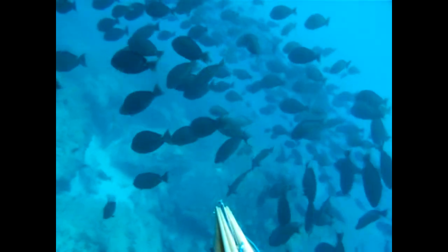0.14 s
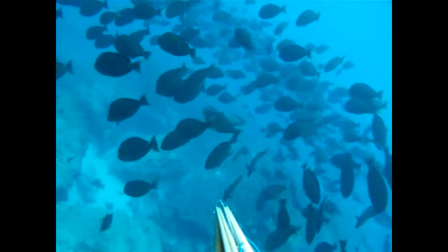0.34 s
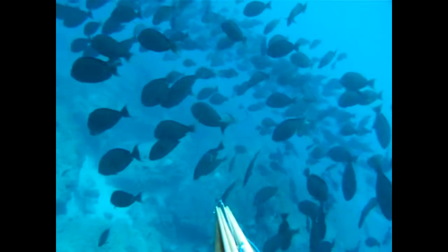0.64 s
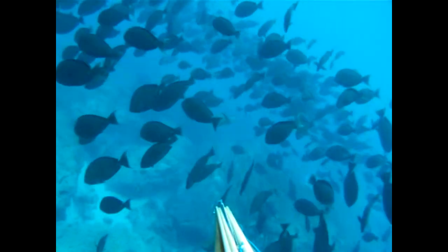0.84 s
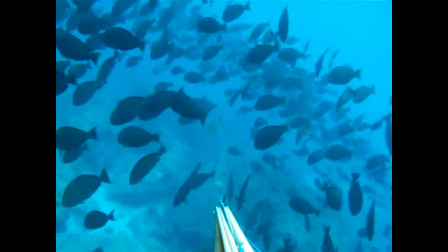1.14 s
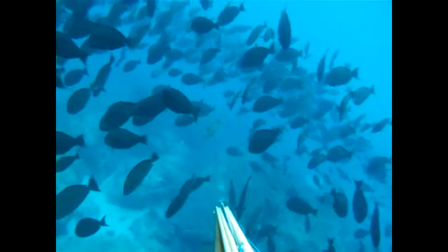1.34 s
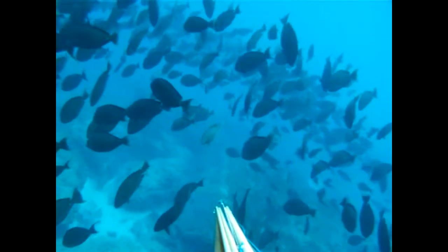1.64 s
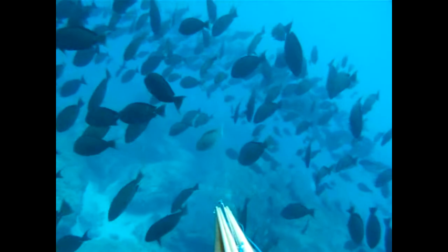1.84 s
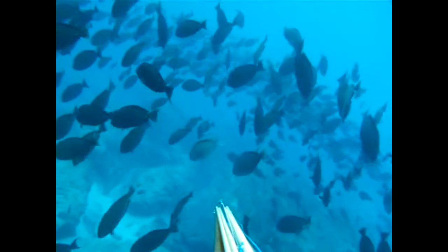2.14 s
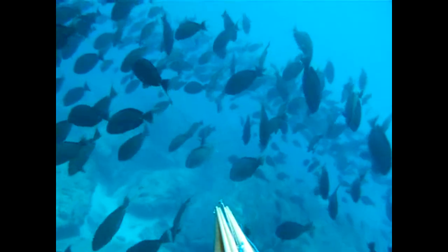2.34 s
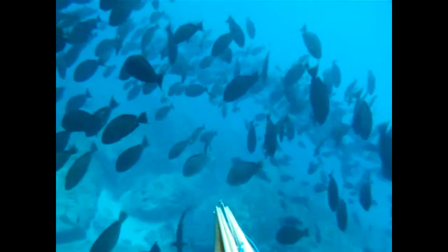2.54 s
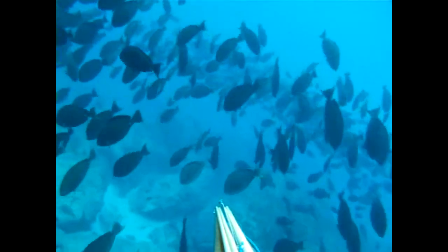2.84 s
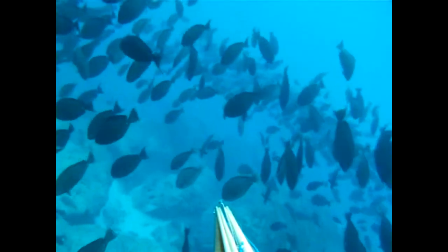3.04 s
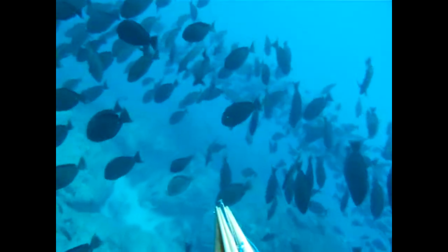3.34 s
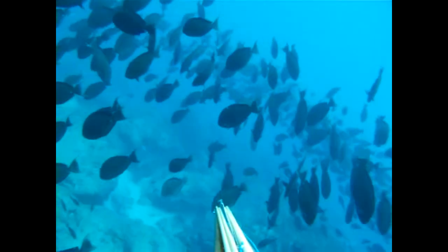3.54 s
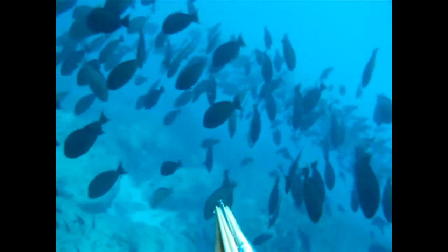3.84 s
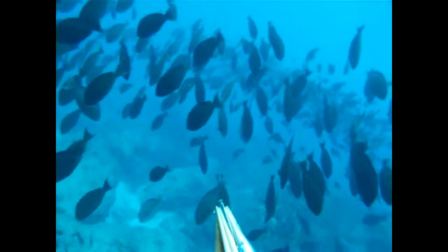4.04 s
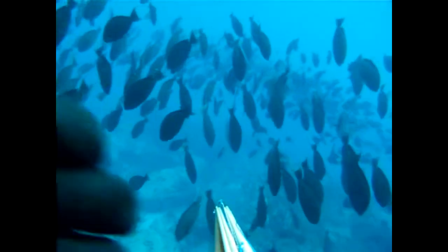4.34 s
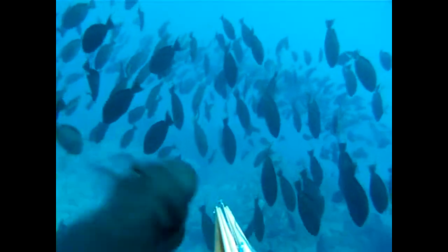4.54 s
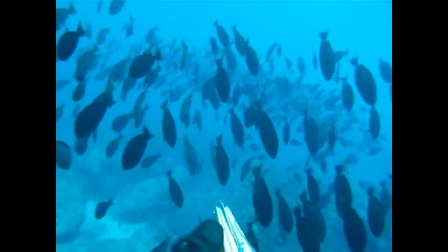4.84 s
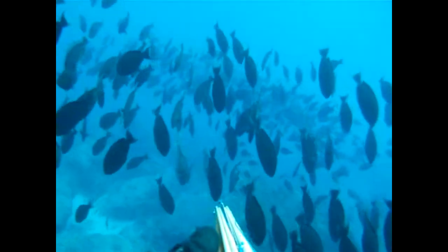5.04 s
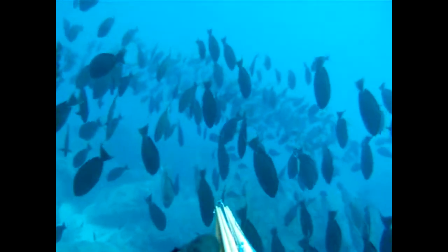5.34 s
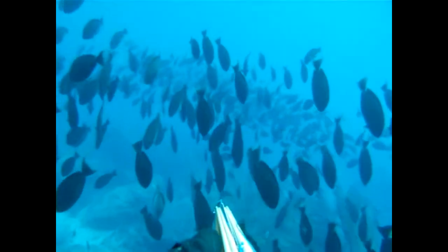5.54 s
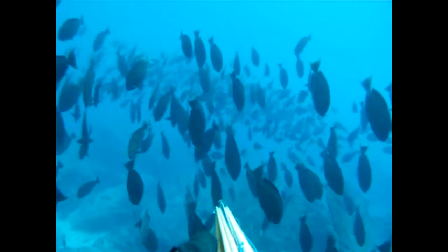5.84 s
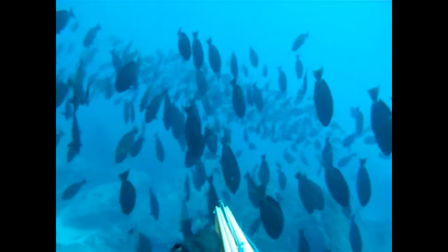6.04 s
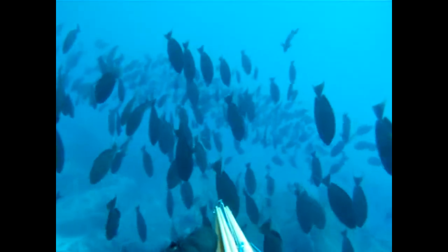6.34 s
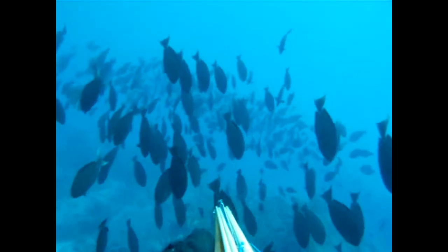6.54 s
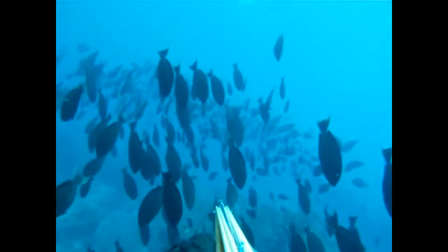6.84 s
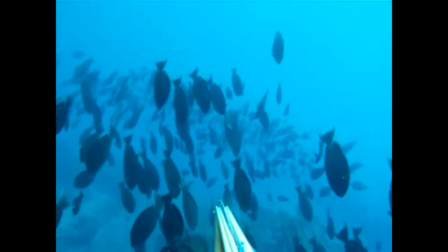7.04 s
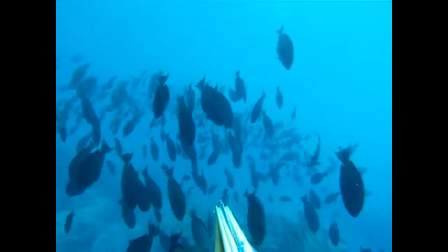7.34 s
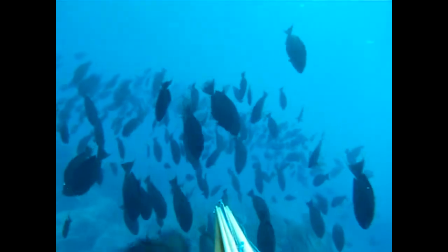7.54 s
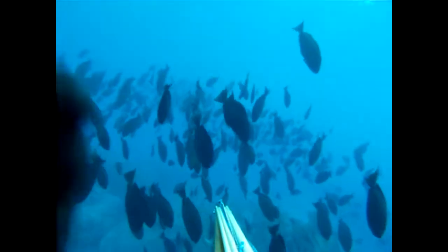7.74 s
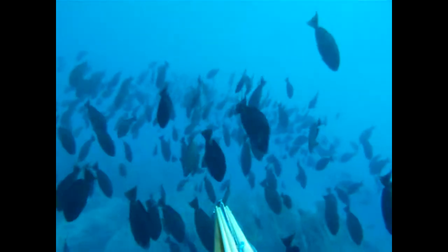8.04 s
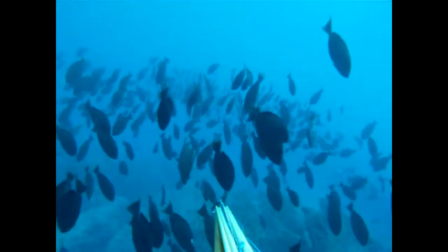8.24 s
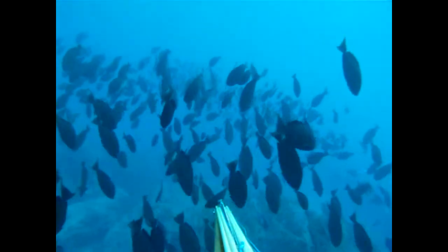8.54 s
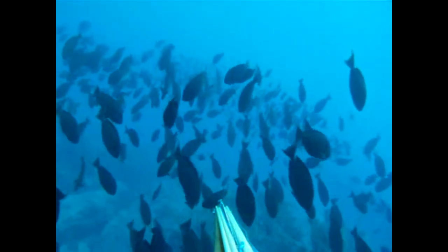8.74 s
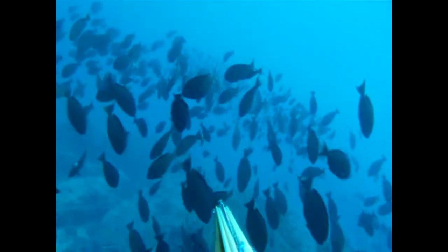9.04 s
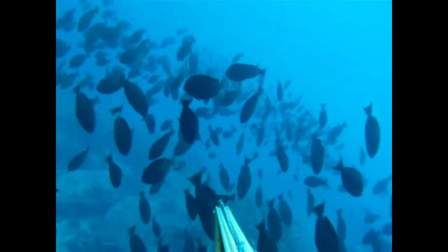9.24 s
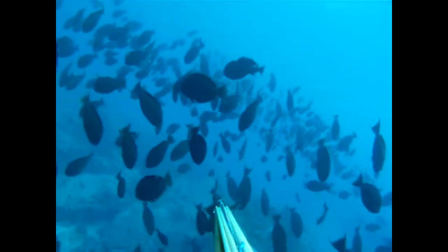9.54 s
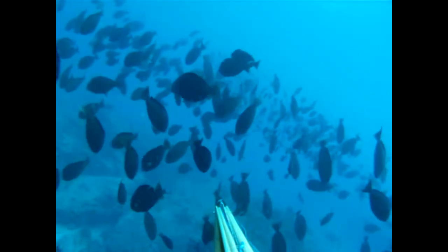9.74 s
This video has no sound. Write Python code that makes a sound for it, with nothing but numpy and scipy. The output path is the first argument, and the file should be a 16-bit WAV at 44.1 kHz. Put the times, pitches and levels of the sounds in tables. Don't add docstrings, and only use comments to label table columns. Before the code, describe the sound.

Underwater at a reef with a large school of fish, heard by a microphone sealed in a camera housing. A steady sizzling hiss of distant snapping shrimp is dotted with sharp nearby clicks. Low rumble and soft slosh swell as the diver moves. A hard knock hits the housing around three seconds, followed by short rubs; dull low thumps come near four and a half, five and seven and a half seconds, and a scrape and loud snap come late.

```python
import sys
import numpy as np
from scipy import signal
from scipy.io import wavfile
from scipy.ndimage import uniform_filter1d

SR = 44100
rng = np.random.default_rng(int(sys.argv[2]) if len(sys.argv) > 2 else 0)


def invert_db(level):
    return 10 ** (np.asarray(level, dtype=float) / 20)


def wav_out(sig):
    wavfile.write(sys.argv[1], SR, np.round(np.clip(np.atleast_2d(sig).T, -1, 1) * 32767).astype(np.int16))


N = 435708


def evened(x):
    return x / np.sqrt(np.mean(x ** 2) + 1e-20)


def curves(rows):
    s, *columns = np.transpose(rows)
    return [np.interp(np.arange(N) / SR, s, column) for column in columns]


def coloured(x, points):
    f, db = np.transpose(points)
    hz = abs(np.fft.fftfreq(8192, 1 / SR))
    gain_db = np.interp(np.log(hz + 1), np.log(f), db, -90, -90)
    log_gain = np.log(invert_db(np.maximum(gain_db, -90)))
    taps = np.fft.ifft(np.exp(np.conj(signal.hilbert(log_gain)))).real[:4096]
    return signal.oaconvolve(x, taps / np.linalg.norm(taps))[:N]


def add(mix, s, sound):
    part = mix[max(round(s * SR), 0):][:len(sound)]
    part += sound[:len(part)]


def swarm(per_s, spread_db, t60, rise_s):
    size = invert_db(spread_db * np.minimum(rng.exponential(1, N), 3.0))
    size = size * (rng.random(N) < per_s / SR)
    t = np.arange(3000) / SR
    scatter = invert_db(-2 * 60 * t / t60) * (1 - np.exp(-t / rise_s))
    power = abs(signal.oaconvolve(size ** 2, scatter)[:N])
    return power / power.mean()


def grains(per_s, spread_db, t60, smooth):
    power = smooth ** 2 + swarm(per_s, spread_db, t60, 0.0024)
    return evened(np.sqrt(power) * rng.standard_normal(N))


def resonate(x, hz, width):
    turn = np.exp(2j * np.pi * np.cumsum(hz) / SR)
    r = np.exp(-np.pi * width / SR)
    return (turn * signal.lfilter([1], np.convolve([1, -r], [1, -r]), x / turn)).real


def ring(hz, t60, rise_s, sag):
    t = np.arange(5000) / SR
    turns = hz * (t + sag * 0.0023 * (1 - np.exp(-t / 0.0014)))
    return np.sin(2 * np.pi * turns) * invert_db(-60 * t / max(t60, .005)) * (1 - np.exp(-t / rise_s))


def stir():
    # (middle [s], length [s], slosh gain [dB], rustle gain [dB])
    moves = [(0.36, 1, 3, 3), (1.222, 0.68, 0, 5.5), (1.815, 0.4, 0.5, 3), (2.488, 0.38, 3, 3.5),
             (3.403, 0.36, 2, 5), (4, 0.58, -2.5, 1.5), (5.054, 2.7, 5, -1), (6.05, 0.96, 2, 3.5),
             (6.75, 0.71, 1, 1), (7.856, 1.26, 4, 4), (8.612, 0.6, 8, 4), (9.15, 2.03, 2, 3.5),
             (9.69, 0.54, 10, -0.5)]
    slosh_rest_db, rustle_rest_db = -58, -61
    t = np.arange(N) / SR
    middle, length, slosh_db, rustle_db = np.transpose(moves)[:, :, None]
    swell = np.cos(np.pi * np.clip((t - middle) / length, -.5, .5)) ** 2
    return slosh_rest_db + (slosh_db * swell).sum(0), rustle_rest_db + (rustle_db * swell).sum(0)


def surge():
    # (start [s], end [s], level [dB], pitch [Hz])
    surges = [(0.0, 0.698, -45, 39.84), (0.807, 1.49, -44.5, 39.78), (1.537, 2.001, -42.5, 40.23),
              (2.248, 3.052, -42, 39.49), (3.112, 3.25, -37, 38.3), (3.296, 3.58, -41.5, 40.7),
              (3.616, 3.795, -39, 42.4), (3.945, 4.285, -40, 41.63), (4.406, 4.516, -37, 42.5),
              (4.554, 4.746, -33.5, 39.84), (4.845, 5.344, -40, 41.13), (5.506, 6.24, -44, 42.24),
              (6.676, 6.941, -42.5, 40.82), (7.102, 7.568, -43.5, 39.37), (7.7, 8.403, -44.5, 41.84),
              (8.687, 8.93, -41.5, 41.3), (9.11, 9.549, -42, 39.75), (9.624, 9.824, -41, 44.6)]
    rest_db, rise_s, fall_s, glide_s = -48.5, 0.11, 0.1, 0.12
    t = np.arange(N) / SR
    start, end, db, hz = np.transpose(surges)[:, :, None]
    shape = np.clip(np.minimum((t - start) / rise_s, (end - t) / fall_s) + .5, 0, 1)
    level = invert_db(rest_db + ((db - rest_db) * shape).max(0))
    pitch = np.interp(t, np.hstack([start, end]).ravel(), np.hstack([hz, hz]).ravel())
    return level, uniform_filter1d(pitch, round(glide_s * SR))


def water():
    # (frequency [Hz], density [dB per Hz])
    slosh_colour = [(55, -23.5), (75, 6.5), (130, -1.5), (300, -7.5), (450, -31.5)]
    # (frequency [Hz], density [dB per Hz])
    rustle_colour = [(200, -8), (330, -7), (500, -4.5), (800, -3.5), (930, -10), (1100, -28.5)]
    slosh_db, rustle_db = stir()
    slosh = coloured(grains(per_s=49.0, spread_db=4.5, t60=0.053, smooth=0.82), slosh_colour)
    rustle = coloured(grains(per_s=48.0, spread_db=3.0, t60=0.13, smooth=1.2), rustle_colour)
    rising = np.clip(np.arange(N) / SR - 6.3, 0, 1)
    air_mode = evened(resonate(rng.standard_normal(N), np.full(N, 900.), 130.0))
    rustle = rustle + .5 * rising * air_mode
    level, hz = surge()
    rough = evened(coloured(rng.standard_normal(N), [(12, -25), (24, -4), (50, 0), (68, -16)]))
    tone = np.sqrt(2) * np.sin(2 * np.pi * np.cumsum(hz) / SR)
    sway = evened(tone + .9 * rough)
    return invert_db(slosh_db) * slosh + invert_db(rustle_db) * rustle + level * sway


def bands(x):
    # (frequency [Hz], density [dB per Hz])
    housing = [(590, -36), (1000, -21), (1160, -15), (1410, -0.5), (1590, 0.5), (1810, -8), (2030, 0),
               (2240, 3), (2810, -5.5), (3080, -7), (3630, -2), (4620, -7.5), (4790, -9), (5160, -8.5),
               (6000, -18.5), (7800, -76), (13200, -120)]
    out = 0
    for drive, edges_hz in zip(x, ([300, 1800], [1800, 2900], [2900, 9000])):
        band = signal.butter(3, edges_hz, "band", fs=SR, output="sos")
        out = out + signal.sosfilt(band, coloured(drive, housing))
    return out


def shrimp():
    # (time [s], peak [dB], body share [dB], treble share [dB])
    near = [(0.0617, -18, -28, -16), (0.2246, -18.5, -24, -15.5), (0.7357, -16, -23, -18),
            (0.816, -20, -2, -35), (0.9885, -15, -14, -19), (1.1231, -8, -20, -15.5),
            (1.3475, -15, -10.5, -26), (1.7294, -14.5, -9.5, -38), (1.928, -10, -16, -21),
            (2.1503, -19, -5.5, -16.5), (2.1743, -14.5, -15, -20), (2.5369, -12, -24, -15.5),
            (2.9942, -16, -15, -16.5), (3.814, -20, -8, -16), (3.9292, -15.5, -15, -19.5),
            (4.3071, -14.5, -8.5, -20), (4.64, -14.5, -14, -17.5), (5.6735, -20, -16, -15.5),
            (6.25, -19, -9, -10.5), (7.1821, -19, -9.5, -16), (7.4144, -16, -6, -23), (7.817, -13, -6, -24),
            (8.0305, -38, 3, -35), (8.162, -16, -9, -30), (8.184, -16, -6, -23), (9.0655, -26, 9, -20),
            (9.1064, -16, -18, -31), (9.4862, -2, -14, -22), (9.586, -18.5, -6, -5.5),
            (9.8006, -21.5, -25, -13)]
    # (time [s], peak [dB], brightness [dB], trading body
    faint = [(0.279, -22.5, 6), (0.371, -27.5, 14), (0.6978, -26, 4), (0.7707, -20.5, 4), (1.4297, -20, 0),
             (2.0637, -19.5, -3), (2.4001, -21.5, -1), (2.4512, -21, -1), (2.576, -25, 6),
             (3.3876, -16.5, 1), (3.529, -25, 6), (3.891, -21.5, -1), (3.9672, -17.5, -0.5), (4.06, -16, 2),
             (4.3822, -28, 11), (4.65, -25, 0), (4.8831, -28.5, 11.5), (4.9875, -25, 11), (5.07, -22.5, 5),
             (5.147, -25.5, -2), (5.4856, -25.5, 6.5), (5.5335, -25.5, 8.5), (5.711, -24, 13),
             (6.822, -21, 4), (7.3309, -21, 0), (7.8776, -16.5, 3.5), (8.7676, -21, -2), (8.9769, -30, 1),
             (9.227, -19, -1), (9.5542, -18.5, -5),
             (0.031, -28, 3), (0.094, -22.5, 6.5), (0.1723, -22.5, 4), (0.4276, -23.5, -3),
             (0.606, -34, -2), (0.7905, -24, -5), (0.8847, -25, 5), (0.9617, -24, 6), (1.053, -21.5, -6.5),
             (1.1986, -25, 4), (1.2277, -25.5, -9), (1.416, -30, -3), (1.6994, -30, -6), (1.828, -25, -6),
             (1.8772, -26, -5), (2.373, -20.5, 0), (2.4758, -28, -1), (2.511, -23, 3), (2.6438, -25, 1),
             (2.678, -27, -9), (2.6974, -34, 1), (2.8769, -20, 5), (3.0335, -22.5, -2), (3.2914, -20, -2),
             (3.4491, -20.5, 0.5), (3.7372, -27, 7), (4.096, -24, 6), (4.2828, -27, 4), (4.776, -27, 4),
             (4.9265, -32, 2), (4.9778, -23, -2), (5.11, -21, 6), (5.1973, -22.5, 2), (5.2754, -30, 9.5),
             (5.444, -32, 15.5), (5.6191, -30, 6), (5.7463, -29.5, 11), (5.8025, -24, 1),
             (5.8259, -22.5, 5), (5.9485, -26.5, 8.5), (6.097, -24, -6), (6.3717, -37, 1), (6.4043, -27, 1),
             (6.5256, -30, 5), (6.6535, -31, 9), (6.8736, -37, 1), (6.8907, -29, -7), (6.9697, -30, -14),
             (7.4405, -26, 5), (7.575, -21.5, 1), (7.5922, -21.5, 7), (7.9578, -25, 5), (8.2722, -20, -4.5),
             (8.3916, -21, 1), (8.7838, -19.5, 4), (9.206, -21.5, 3), (9.4379, -23, 8), (9.5392, -20, -2),
             (9.628, -24, 5), (9.7378, -23.5, -1)]
    # (time [s], peak [dB])
    pricks = [(4.3394, -40), (4.4677, -36), (4.4994, -40), (4.8165, -39), (4.8994, -40), (5.0923, -31),
              (5.1123, -33), (6.0432, -38), (6.119, -37), (6.2497, -25), (6.355, -37), (6.6533, -32),
              (6.8209, -32), (7.8022, -34), (7.9744, -35), (8.084, -38), (8.2282, -34), (8.3674, -35),
              (8.4582, -34), (9.206, -31), (9.3292, -36), (9.4469, -32), (9.5856, -17)]
    # (time [s], level [dB])
    crowd_level = [
        (0.0, -44),
        (2.28, -43.5),
        (4.0, -45),
        (4.9, -46),
        (6.24, -44.5),
        (7.21, -45),
        (7.54, -44.5),
        (9.35, -43.5),
        (9.88, -46),
    ]
    snaps = near + [(s, db, -10.5 - tilt, -16.5 + tilt) for s, db, tilt in faint]
    drive, t = np.zeros((3, N)), np.arange(2600) / SR
    for s, db, body_db, treble_db in snaps:
        noise = rng.standard_normal((3, len(t)))
        decay = invert_db(-2.5 - 60 * t / 0.015) + invert_db(-12.0 - 60 * t / 0.1)
        crack = decay * (1 - np.exp(-t / 0.00026))
        noise[:, 10] = np.clip(db + 33, 6, 15) * (1 + .3 * np.tanh(noise[:, 1]))
        echo_delay = 290 + int(110 * abs(np.tanh(noise[0, 0])))
        crack = crack + invert_db(-9.0) * np.roll(crack, echo_delay) * (t > .005)
        ring_db = -3 - 10 * np.log10(1 + invert_db(2 * (body_db - 4.0)))
        for k, share_db in enumerate((body_db - .6, ring_db - 7.5, treble_db + 2.0)):
            add(drive[k], s, invert_db(db + share_db) * crack * noise[k])
    for s, db in pricks:
        add(drive[2], s, invert_db(db + 11) * np.array([1., -1.]))
    shared = swarm(per_s=65.0, spread_db=3.5, t60=0.035, rise_s=0.00028)
    fine = swarm(per_s=130.0, spread_db=1.5, t60=0.008, rise_s=0.0002)
    own = np.array([swarm(per_s=100.0, spread_db=3.0, t60=0.043, rise_s=0.0005) for _ in drive])
    clusters = swarm(per_s=14., spread_db=0.0, t60=0.084, rise_s=0.0046)
    power = 0.56 + 0.18 * shared + 0.26 * fine * (0.3 + 0.61 * clusters) + 0.19 * clusters + 0.46 * own
    crowd = np.sqrt(power) * rng.standard_normal((3, N))
    return bands(drive) + invert_db(curves(crowd_level)[0] + 1.0) * evened(bands(crowd))


def fish():
    # (time [s], peak [dB], pitch [Hz], t60 [s])
    thumps = [(0.005, -32.5, 218, 0.053), (0.978, -61, 227.5, 0.03), (1.3125, -32, 178, 0.042),
              (1.842, -55, 99, 0.058), (2.369, -42.5, 225, 0.047), (4.319, -50, 106, 0.044),
              (4.597, -43, 130, 0.042), (4.464, -19.5, 155.2, 0.038), (5.027, -37.5, 180, 0.048),
              (5.314, -15.5, 171.3, 0.025), (5.3515, -27, 178, 0.035), (6.098, -23, 156, 0.044),
              (6.487, -33.5, 116, 0.023), (6.741, -49, 102.6, 0.046), (6.977, -48, 108.7, 0.067),
              (7.638, -15, 183, 0.025), (7.945, -37, 135.5, 0.026), (9.012, -34, 120, 0.035),
              (9.0225, -32, 215, .04), (9.458, -47, 192.6, 0.069)]
    # (frequency [Hz], level [dB], t60 ratio [1])
    bladder = [
        (255.3, 0, 1.32),
        (430, 2, 0.47),
    ]
    # (time [s], peak [dB])
    croak = [
        (1.6195, -48),
        (1.6272, -32),
        (1.6365, -42),
        (1.6445, -43),
        (1.6522, -31.5),
        (1.6612, -37),
        (1.6672, -35),
        (1.6765, -40),
        (1.6845, -31.5),
        (1.6935, -39),
    ]
    out = np.zeros(N)
    for s, db, hz, t60 in thumps:
        modes = ring(hz, t60, 0.0083, 0.071)
        for upper_hz, upper_db, longer in bladder:
            modes = modes + invert_db(upper_db) * ring(upper_hz, t60 * longer, 0.016, 0.052)
        add(out, s - .001, invert_db(db + 10.5) * modes)
    out = signal.sosfilt(signal.butter(3, 560, fs=SR, output="sos"), out)
    croak_hz, croak_t60 = 760, 0.021
    pulse = ring(croak_hz, croak_t60, 0.0043, -0.54)
    pulse = pulse + 0.39 * ring(0.59 * croak_hz, croak_t60, 0.0023, 0)
    pulse = pulse + 0.4 * ring(1.83 * croak_hz, croak_t60, 0.0021, 0)
    for s, db in croak:
        add(out, s, invert_db(db + 10.5) * pulse)
    return out


def knock(hz, t60):
    bounce_s, bounce_t60 = 0.0089, 0.03
    out, odd = np.zeros(5000), rng.standard_normal((4, 2))
    short = min(t60, bounce_t60)
    for k, (late, off) in enumerate(odd):
        s = k * bounce_s * (1 + 0.091 * late)
        f = hz * (1 + 0.051 * off * (k > 0))
        modes = ring(f, short, 0.0015, -0.096)
        modes = modes + .5 * ring(0.77 * f, 0.62 * short, 0.00047, .02)
        modes = modes - 0.5 * ring(1.05 * f, 0.56 * short, 0.00028, 0)
        add(out, s, invert_db(-52 * s / t60) * modes)
    return out


def stroke(rows, colour, per_s, smooth):
    before, after = (rows[0][0] - .01, -90), (rows[-1][0] + .02, -90)
    level_db = curves([before] + list(rows) + [after])[0]
    return invert_db(level_db) * coloured(grains(per_s, spread_db=-5.0, t60=0.021, smooth=smooth), colour)


def gear():
    # (time [s], peak [dB], pitch [Hz], t60 [s])
    knocks = [(0.005, -37, 548, 0.048), (0.322, -53, 634, 0.035), (0.361, -48, 570, 0.032),
              (0.395, -49, 634, 0.042), (0.43, -45.5, 541, 0.034), (0.984, -44, 524, 0.033),
              (1.229, -40, 517, 0.047), (1.3468, -29, 660, 0.03), (1.805, -49, 660, 0.05),
              (2.365, -45, 680, 0.082), (2.569, -46.5, 640, 0.048), (4.308, -51, 684, 0.024),
              (4.596, -52, 577, 0.049), (4.643, -58, 846, 0.035), (6.968, -45.5, 790, 0.13),
              (7.418, -40, 814, 0.047), (7.813, -36, 761, 0.064), (8.03, -36.5, 750, 0.15),
              (9.0165, -33, 456, 0.025), (9.068, -47, 798, 0.057), (9.736, -52, 675, 0.035),
              (9.793, -53, 787, 0.037), (0.377, -52, 650, 0.04), (0.41, -53, 710, 0.03),
              (7.582, -50, 797, 0.087), (7.637, -50, 860, 0.1)]
    # (time [s], peak [dB], pitch [Hz], t60 [s])
    pings = [
        (8.9775, -25, 5470, 0.0086),
        (9.5857, -35, 5100, 0.0082),
        (9.586, -26, 3700, 0.009),
        (8.0301, -14.5, 1520, 0.014),
        (9.4862, -15, 1580, .02),
        (9.447, -34, 5400, .01),
    ]
    # (delay [s], frequency [Hz], level [dB], t60 [s])
    blow = [
        (0, 430, 18, 0.0079),
        (0, 577, 18.5, 0.0084),
        (0, 1116, 12, 0.01),
        (0, 1447, 4, 0.015),
        (.0014, 2110, 19, 0.0047),
        (.0014, 2820, 5, .006),
        (0, 3700, 20, .004),
        (0, 4900, -5, .006),
    ]
    # (frequency [Hz], level [dB], t60 [s])
    after_ring = [
        (100, -30.5, 0.18),
        (228, -21, 0.046),
        (420, -20.5, 0.07),
        (580, -20, 0.11),
        (680, -21, .07),
        (836, -26.5, 0.041),
    ]
    # (time [s], level [dB])
    scrape = [
        (8.405, -40),
        (8.43, -34.5),
        (8.5, -34),
        (8.62, -51),
    ]
    # (frequency [Hz], density [dB per Hz])
    scrape_colour = [(88, -40), (150, -8), (489, -3.5), (708, -11.5), (972, -7.5), (1060, -14), (1510, 3),
                     (1710, -4.5), (2310, -4.5), (3080, -22), (4000, -16), (5200, -46), (8800, -120)]
    # (time [s], level [dB])
    rub = [
        (3.33, -51),
        (3.36, -46),
        (3.4, -46),
        (3.43, -41),
        (3.465, -38),
        (3.49, -51.5),
        (3.55, -46.5),
        (3.575, -52),
        (3.595, -42),
        (3.63, -56),
    ]
    # (frequency [Hz], density [dB per Hz])
    rub_colour = [(53, -43), (90, -16), (182, -5), (265, -8), (305, -16), (376, -14), (793, -26.5),
                  (1000, -31), (1300, -56), (2200, -120)]
    blow_s, blow_db = 3.0871, -1
    out = np.zeros(N)
    for s, db, hz, t60 in knocks:
        chatter = evened(uniform_filter1d(rng.standard_normal(5000), size=40))
        add(out, s, invert_db(db + 11.5) * (1 + 0.29 * chatter) * knock(hz, t60))
    for s, db, hz, t60 in pings:
        add(out, s, invert_db(db + 6.5) * ring(hz, t60, 0.00094, 0))
    for delay_s, hz, db, t60 in blow:
        add(out, blow_s + delay_s, -invert_db(blow_db + db) * ring(hz, t60, 0.00081, 0))
    rattle = invert_db(-21.5 - 60 * np.arange(2000) / SR / 0.022) * rng.standard_normal(2000)
    add(out, blow_s, rattle)
    for hz, db, t60 in after_ring:
        waver = evened(uniform_filter1d(rng.standard_normal(5000), size=150))
        add(out, blow_s + 0.0023, invert_db(db) * ring(hz, t60, 0.0066, 0.36) * (1 + 0.44 * waver))
    out = out + stroke(scrape, scrape_colour, per_s=200.0, smooth=1.0)
    return out + stroke(rub, rub_colour, per_s=99.0, smooth=0.49)


def clangs():
    # (time [s], peak [dB], main pitch [Hz], upper pitch [Hz], upper share [dB])
    shell_rings = [(0.2258, -21, 2320, 3980, -8), (0.818, -25, 1460, 3610, -10),
                   (1.1233, -8, 2150, 3670, -4), (1.3478, -16.5, 2370, 3350, -4),
                   (1.7295, -19, 2230, 3390, -12), (1.929, -14, 2210, 3400, -6),
                   (2.1505, -20.5, 2050, 3470, -2), (2.5371, -11, 2215, 3630, -9),
                   (3.8137, -19.5, 2260, 3650, -6), (4.3076, -18.5, 2220, 3600, -10),
                   (4.6399, -20, 2170, 3060, -9), (5.674, -22.5, 2130, 3520, -6),
                   (6.2498, -23.5, 2390, 3520, -8), (7.1809, -18.5, 2386, 3400, -6),
                   (7.4157, -16, 2200, 3855, -6), (7.8147, -20, 2190, 3260, -8),
                   (8.183, -22, 1657, 3820, -8), (9.0678, -21.5, 2290, 3500, -10),
                   (9.4857, -10, 2450, 2860, -9), (9.8006, -20, 2700, 3440, -5)]
    main_t60, upper_t60 = 0.018, 0.013
    out = np.zeros(N)
    for s, db, hz, upper_hz, upper_db in shell_rings:
        modes = ring(hz, main_t60, 0.00062, 0)
        modes = modes + 0.27 * ring(0.724 * hz, main_t60, 0.00043, 0)
        modes = modes + invert_db(upper_db) * ring(upper_hz, upper_t60, 0.00027, 0)
        add(out, s, invert_db(db - 4) * modes)
    return out


def moans():
    # (start [s], end [s], pitch
    # [Hz], level [dB])
    moan_rows = [(2.257, 3.074, 250, -60), (3.129, 3.35, 95, -57), (3.345, 3.433, 192, -44.5),
                 (3.46, 3.57, 184, -47), (3.59, 3.635, 188.2, -48), (4.3, 4.394, 120, -49),
                 (1.8, 1.903, 100, -50), (6.7, 6.798, 105.7, -53), (5.4, 5.845, 150, -58.5),
                 (8.155, 8.85, 108.5, -52), (9.3, 9.602, 136.3, -54.5), (9.598, 9.754, 244, -53)]
    out = np.zeros(N)
    for start, end, hz, db in moan_rows:
        noise = rng.standard_normal(round((end - start) * SR))
        tone = evened(resonate(noise, np.full(len(noise), float(hz)), 37.0))
        add(out, start, invert_db(db) * tone * signal.windows.tukey(len(noise), .6))
    return out


def scene():
    pressure = water() + shrimp() + fish() + gear() + clangs() + moans()
    return np.tile(pressure, (2, 1))


def top_cut(x):
    return signal.sosfilt(signal.butter(12, 12310, fs=SR, output="sos"), x)


def record(dry):
    slow_rate, hold = 12000, 4
    over = np.maximum(uniform_filter1d(np.minimum(dry[0] ** 2, 1), size=200) - .1, 0)
    late_over = uniform_filter1d(np.roll(over, 520), size=400)
    duck = signal.lfilter([.004], [1, -np.exp(-1 / (0.0312 * SR))], late_over)
    slow = signal.resample_poly(dry / (1 + 7.6 * duck), slow_rate // 300, SR // 300, axis=1)
    steps = np.repeat(np.clip(slow, -1, 1), hold, axis=1)
    held = signal.resample_poly(steps, SR // 300, slow_rate * hold // 300, axis=1)
    held = np.pad(held, ((0, 0), (0, N)))[:, :N]
    dull = signal.lfilter(*signal.butter(1, 17000, fs=SR), held)
    flutter = evened(uniform_filter1d(rng.standard_normal(N), size=60))
    flutter = flutter * np.sqrt(swarm(4., 3.9, 0.065, 0.0095))
    dull = dull * (1 + invert_db(-33.5) * flutter * [[1], [-1]])
    top = signal.sosfiltfilt(signal.butter(10, 12550, "high", fs=SR, output="sos"), dull)
    return top_cut(np.clip(dull - 0.55 * top, -1, 1))


dry = scene()
out = record(dry)
wav_out(out)
```